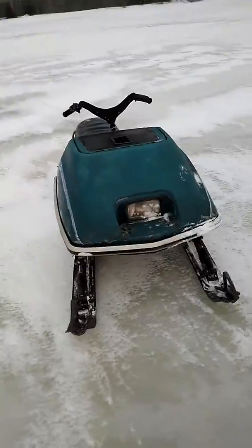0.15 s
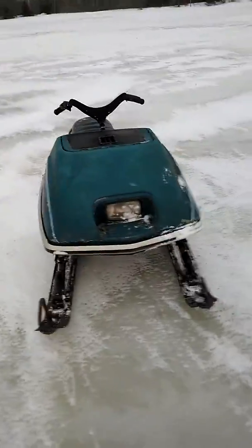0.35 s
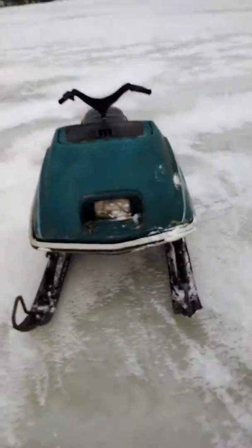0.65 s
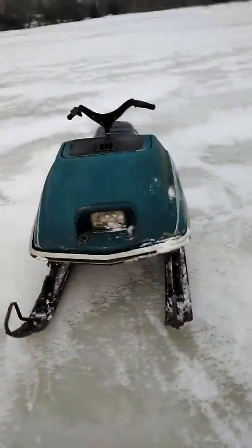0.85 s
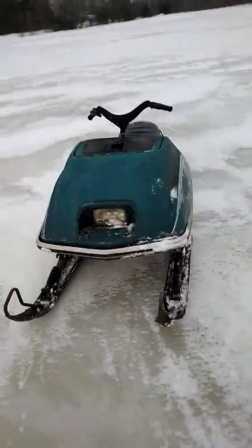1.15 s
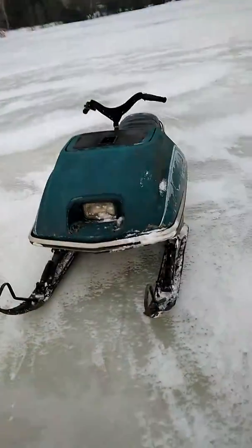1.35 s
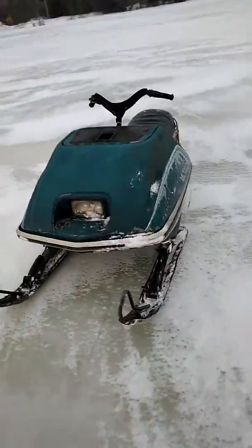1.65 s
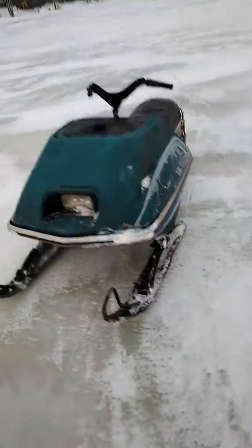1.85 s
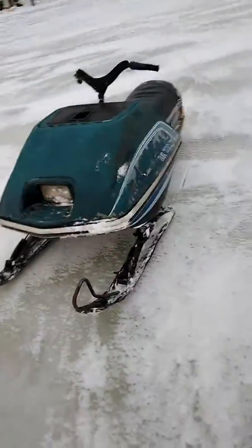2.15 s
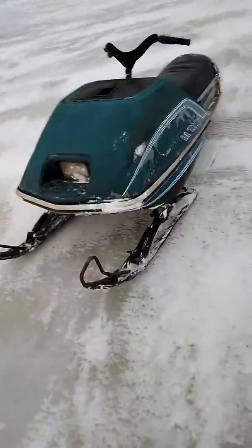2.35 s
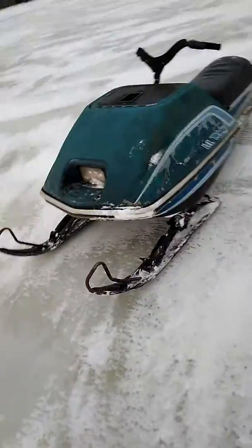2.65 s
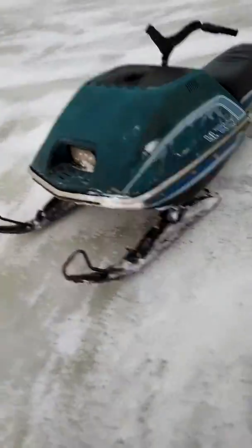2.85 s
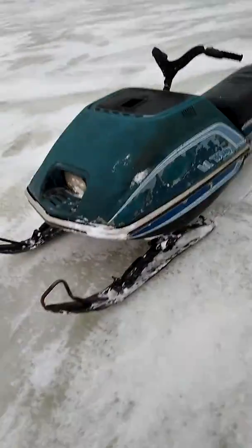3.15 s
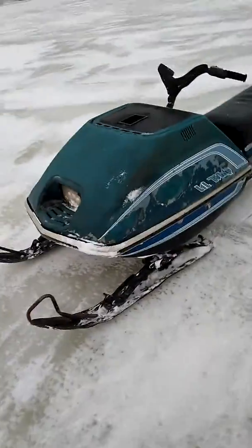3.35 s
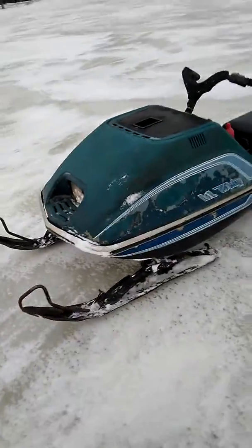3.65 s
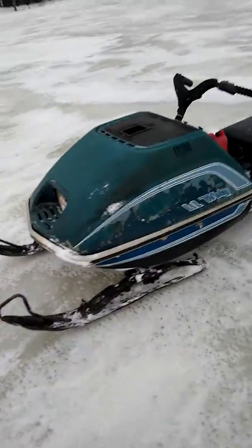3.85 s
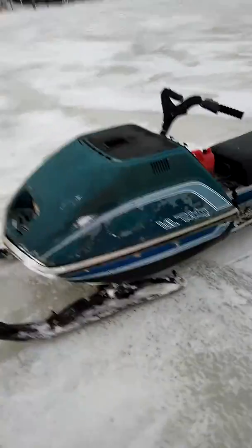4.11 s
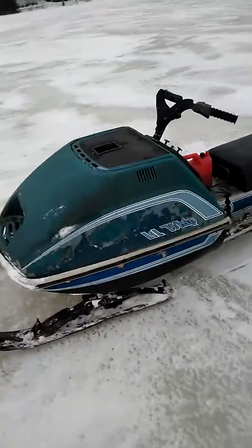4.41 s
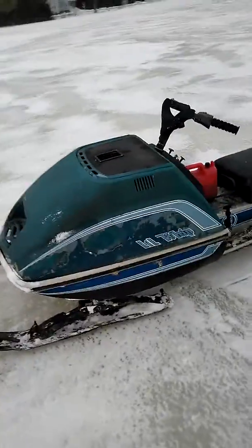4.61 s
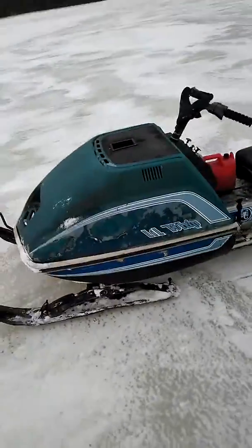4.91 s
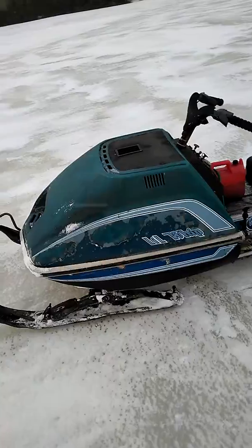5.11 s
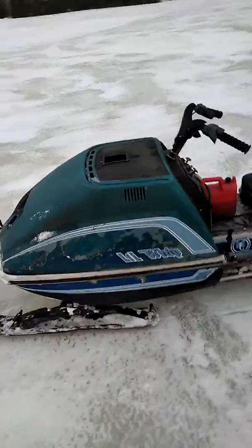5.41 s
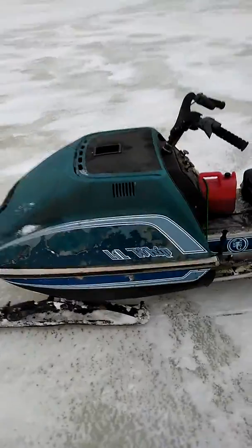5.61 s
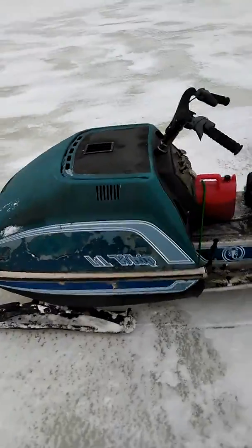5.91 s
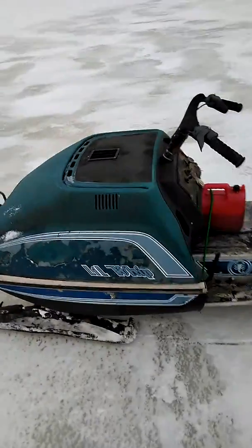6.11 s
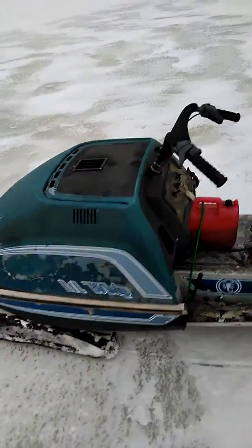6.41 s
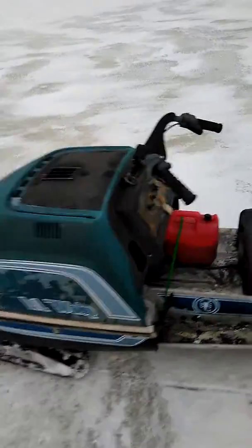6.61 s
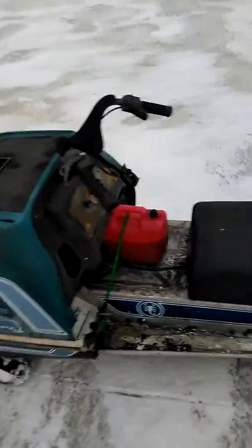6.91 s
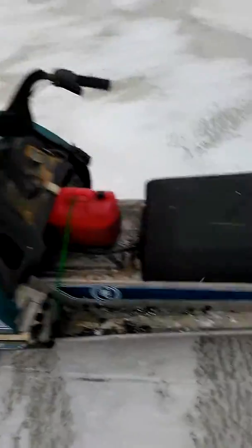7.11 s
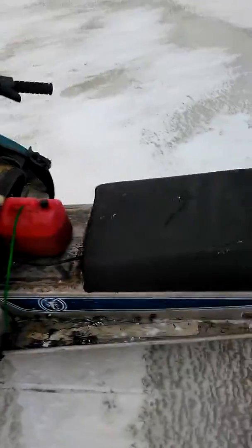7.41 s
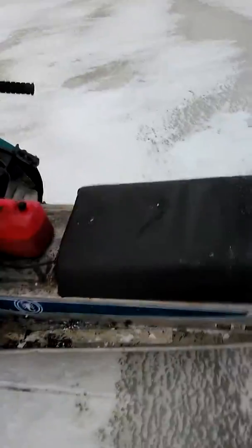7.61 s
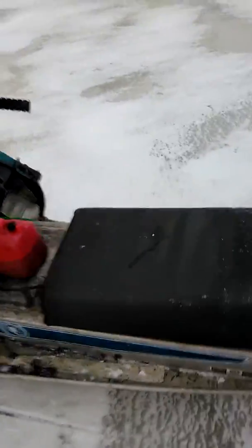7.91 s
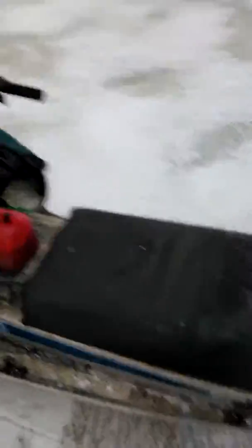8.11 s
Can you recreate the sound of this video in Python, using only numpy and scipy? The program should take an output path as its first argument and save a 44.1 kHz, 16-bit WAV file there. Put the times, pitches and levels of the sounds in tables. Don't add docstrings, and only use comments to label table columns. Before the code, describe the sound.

Steady but lumpy two-stroke idling, already running at the start and still running at the end. Uneven firings nudge the low drone about forty turns a second; raspy puffs of hiss and rattle pulse with the crank, briefly faltering. The exhaust hum grows fuller past the middle, then recedes as mechanical clatter comes nearer. Close handheld stereo phone, dry open air, compressed bass and thin, brittle highs.

```python
import sys
import numpy as np
from scipy import signal
from scipy.fft import rfft, irfft, next_fast_len
from scipy.io import wavfile
from scipy.ndimage import uniform_filter1d

SR = 44100
rng = np.random.default_rng(int(sys.argv[2]) if len(sys.argv) > 2 else 0)


def inscribe(sig):
    pcm = np.round(np.clip(np.atleast_2d(sig).T, -1, 1) * 32767)
    wavfile.write(sys.argv[1], SR, pcm.astype(np.int16))


def boost(x):
    u = np.asarray(x, float) / 20
    return 10 ** u


N = 364266

# (time [s], speed [turns/s])
SPEED = [(0.0, 37.902), (0.5, 38.797), (1.0, 38.575), (1.25, 38.992), (1.75, 38.613), (2.25, 37.467),
         (2.5, 38.36), (3.0, 38.116), (3.5, 38.779), (3.75, 38.959), (4.0, 39.456), (4.51, 39.795),
         (5.01, 39.079), (5.51, 39.454), (7.01, 38.454), (7.51, 38.65), (8.01, 39.239), (8.26, 39.949)]
# (time [s], exhaust side in view [dB], nearness to engine [dB], nearness to vents [dB])
WALK = [(0.0, -3.5, 0.5, 0.5), (0.5, -0.5, 1, 0), (1.0, 1.5, 0.5, 1.5), (1.5, 0.5, 1.5, 0),
        (2.0, -1.5, -0.5, 1), (2.5, -0.5, -0.5, -1.5), (3.0, -1.5, 0, -1.5), (3.5, -1.5, -1, -2),
        (4.0, 3, -1, -1.5), (4.5, 2, 1, 0.5), (5.0, 4, 0.5, -1.5), (5.5, 5, 2, 0), (6.0, 4, 1.5, -1),
        (6.5, 2.5, 2, 0.5), (7.0, -2.5, 2.5, 0.5), (7.5, -4.5, 3, 2.5), (8.0, -6, 4, 0.5),
        (8.26, -4, 4, 2.5)]
# (first firing [s], firings [count], gap [s], thump level [dB])
FIRING_RUNS = [(0.4, 3, 0.206, -17.5), (0.686, 2, 0.23, -18.0), (1.123, 4, 0.103, -23.0),
               (1.563, 1, 0.0, -17.0), (1.764, 3, 0.107, -23.0), (2.024, 1, 0.0, -18.0),
               (2.136, 2, 0.13, -22.0), (2.43, 4, 0.155, -23.0), (2.478, 1, 0.0, -21.5),
               (2.789, 1, 0.0, -19.0), (3.235, 2, 0.086, -19.0), (3.367, 2, 0.105, -22.0),
               (3.597, 3, 0.079, -25.0), (3.853, 2, 0.08, -25.0), (4.235, 3, 0.075, -23.0),
               (4.586, 3, 0.151, -24.5), (4.84, 1, 0.0, -16.5), (5.018, 3, 0.077, -23.5),
               (5.275, 4, 0.076, -23.5), (5.459, 1, 0.0, -20.5), (5.554, 5, 0.102, -23.5),
               (6.116, 2, 0.048, -23.5), (6.269, 3, 0.129, -24.5), (6.606, 3, 0.18, -23.0),
               (7.017, 3, 0.105, -19.5), (7.304, 1, 0.0, -17.5), (7.385, 3, 0.233, -22.0),
               (7.717, 2, 0.08, -19.0), (7.925, 1, 0.0, -18.0), (8.026, 3, 0.078, -21.5),
               (0.108, 1, 0, -28), (0.27, 1, 0, -21), (0.758, 1, 0, -28), (1.703, 1, 0, -21),
                (4.44, 2, 0.125, -31), (4.133, 1, 0, -20), (5.058, 1, 0, -23), (5.696, 1, 0, -22),
                (7.075, 2, 0.098, -26), (7.538, 1, 0, -20), (0.027, 1, 0.0, -22.0),
                (0.159, 2, 0.046, -21.0), (0.357, 2, 0.162, -22.0), (0.872, 1, 0.0, -32.0),
                (1.035, 2, 0.153, -19.0), (1.657, 1, 0.0, -26.0), (1.942, 1, 0.0, -26.0),
                (2.207, 2, 0.159, -23.0), (2.68, 1, 0.0, -24.0), (3.017, 1, 0.0, -20.5),
                (3.126, 2, 0.048, -19.5), (3.541, 1, 0.0, -24.0), (3.894, 3, 0.151, -21.0),
                (4.525, 2, 0.15, -19.0), (4.956, 1, 0.0, -23.0), (5.236, 2, 0.156, -21.0),
                (5.719, 1, 0.0, -26.0), (5.924, 2, 0.129, -21.0), (6.207, 1, 0.0, -19.5),
                (6.461, 1, 0.0, -29.0), (6.701, 2, 0.041, -20.0), (6.904, 1, 0.0, -22.0),
                (7.341, 2, 0.135, -18.0), (7.759, 1, 0.0, -20.0), (8.066, 2, 0.179, -22.5)]
# (crank order, level [dB], lag [cycles])
LOW_ORDERS = [(2, -15.5, 0.079), (3, -23, 0.71), (4, 0, 0.44), (5, -31, 0.86)]
UPPER_ORDERS = [(6, 5, 0.39), (7, -50, 0.78), (8, -3, 0.54)]
# (crank order, level [dB], lag [cycles])
THUMP_ORDERS = [(2, -33, 0.036), (2.5, -22, 0.23), (3, 6.5, 0.5), (3.5, -15, 0.5)]
CRACK_ORDERS = [(6, 8, 0.69), (7, 5, 0.92), (8, -26, 0.25), (9, -2.5, 0.5)]
# (centre [Hz], width [Hz], level [dB])
PANELS = [(738, 50, 0), (964, 42, 4), (1189, 20, -3)]
PANEL_PER_VIEW = [1.1, 0., 0.]
PANEL_PER_NEAR = [0., 1.8, 0.]
# (time [s], depth [dB], length [s])
LULLS = [(0.175, -13, 0.064), (0.481, -6, 0.022), (0.674, -8, 0.041), (0.86, -10, 0.17), (1.44, -9, 0.019),
         (1.857, -18, 0.014), (1.987, -10.5, 0.12), (2.23, -22, 0.014), (2.278, -39, 0.008),
         (2.425, -21, 0.012), (2.872, -10, 0.065), (3.135, -14, 0.022), (3.31, -11, 0.054),
         (3.71, -11, 0.011), (4.158, -2, 0.047), (4.357, -13, 0.046), (4.44, -18, 0.015), (4.676, -7, 0.06),
         (4.814, -8, 0.016), (4.968, -35, 0.015), (5.212, -14, 0.027), (5.535, -11, 0.093),
         (5.712, -10, 0.091), (5.93, -5, 0.1), (6.16, -4, 0.013), (6.392, -9, 0.067), (6.566, -5, 0.022),
         (6.756, -4, 0.049), (7.354, -8, 0.029), (8.225, -12, 0.014)]
# (first turn [s], last turn [s], level [dB])
BURSTS = [(.07, .13, 6.5), (.2, .29, 7.5), (.35, .36, 7), (.39, .445, 9), (.51, .575, 6), (.69, .75, 8.5),
          (.9, .985, 1), (1.07, 1.14, 6), (1.19, 1.24, 6), (1.34, 1.395, 2.5), (1.47, 1.53, 2.5),
          (1.73, 1.76, 5), (1.86, 1.91, 6), (2.04, 2.07, -2), (2.3, 2.355, 8), (2.465, 2.495, 7),
          (2.78, 2.81, 9.5), (2.91, 2.94, 7.5), (3.165, 3.26, 7.5), (3.51, 3.535, 5.5), (3.61, 3.69, 8.5),
          (3.73, 3.85, 9.5), (3.925, 3.97, 7.5), (4.075, 4.125, 6.5), (4.2, 4.28, 8.5), (4.375, 4.405, 9),
          (4.45, 4.48, 1), (4.55, 4.61, 7), (4.7, 4.78, 5.5), (4.855, 4.91, 6.5), (4.98, 4.99, 10.5),
          (5.035, 5.045, 5), (5.11, 5.14, 5.5), (5.235, 5.315, 3), (5.385, 5.47, 5.5), (5.57, 5.62, 8),
          (5.77, 5.8, 7.5), (5.95, 5.98, 10.5), (6.075, 6.135, 10.5), (6.185, 6.28, 9), (6.41, 6.42, 10.5),
          (6.51, 6.52, 7), (6.59, 6.7, 7.5), (6.775, 6.805, 10), (6.895, 6.99, 10.5), (7.05, 7.165, 7),
          (7.285, 7.295, 2), (7.37, 7.53, 5), (7.555, 7.68, 6.5), (7.785, 7.835, 11), (7.885, 7.905, 11),
          (7.96, 7.99, 10), (8.04, 8.115, 8.5), (8.14, 8.195, 5)]
# (time [s], peak [dB])
RAPS = [(0.229, -13), (0.258, -14), (0.387, -10), (0.4125, -4), (0.692, -6), (0.7183, -14), (0.8989, -15),
        (0.9258, 0), (1.2077, -11), (1.3897, -5), (1.5269, -16), (1.857, -11), (1.8807, -13), (2.4663, -6),
        (2.4922, -7), (3.1604, 1), (3.6094, -18), (3.7309, -14), (3.921, -6), (4.0726, -10), (4.0971, -9),
        (4.1225, -22), (4.247, -25), (4.3728, -12), (4.449, -17), (4.549, -16), (4.7534, -16), (4.778, -8),
        (4.9044, -15), (4.9793, -20), (5.44, -23), (5.466, -5), (5.9474, -19), (6.13, -15), (6.2292, -19),
        (6.5127, -22), (6.59, -5), (6.7713, -7), (6.9237, -15), (7.2896, -11), (7.5272, -12), (7.6243, -10),
        (7.786, -19), (7.9024, -15), (8.057, -3), (8.11, -11), (8.188, -16), (8.2357, -14)]
# (time [s], peak [dB], casing knock [dB], lighter snap one turn before [dB])
SNAPS = [(0.4139, -8, -49, -20), (0.7201, -10, -43, -20), (0.9599, -3, -44, -20), (0.9857, -6, -44, -20),
         (1.0933, -9, -45, -20), (1.2081, -9, -37, -20), (1.5284, -7, -42, -20), (1.7346, -10, -45, -20),
         (1.8829, -10, -43, -20), (2.2044, -5, -35, -20), (2.2538, -5, -48, -20), (2.2972, -5, -31, -20),
         (2.3241, -10, -42, -20), (2.4245, -7, -45, -20), (2.4934, -13, -45, -20), (3.6733, -7, -41, -20),
         (4.0985, -8, -36, -20), (4.3781, -8, -42, -20), (4.7805, -2, -28, -12), (4.82, -1, -36, -20),
         (5.4682, -6, -29, -10), (6.1669, -8, -31, -20), (6.5918, -11, -38, -20), (6.9285, -7, -39, -20),
         (7.5294, -12, -34, -20), (7.6259, -15, -33, -20), (7.7876, -14, -30, -20),
         (7.9032, -4.5, -36.5, -20), (8.1135, -11, -30, -20), (8.2372, -10, -33, -20)]
# (frequency [Hz], gain [dB])
LEFT_RESPONSE = [(350, 14), (500, 5.5), (720, 1), (960, 1), (1200, -1), (2000, -5), (2500, -3.5),
                 (3500, -6), (5000, -0.5), (8000, 1.5), (10000, 2), (11000, -3), (13000, -2.5),
                 (15700, -34)]
RIGHT_RESPONSE = [(350, 8.5), (500, 6), (720, 0), (960, -5.5), (1200, 1.9), (2000, -3.5), (2500, -17),
                  (3200, -6.5), (4200, 3), (5500, 7.5), (10300, 7.5), (11000, 4.5), (13000, 11.5),
                  (15700, 2.5)]
# (frequency [Hz], likeness [0..1])
LIKENESS = [(400, 0.91), (1200, 0.93), (2500, 0.086), (4000, 0.87), (6000, 0.016)]
# (frequency [Hz], threshold against usual level [dB])
THINNING = [(700, -25), (1100, -7), (1600, -3), (2200, -8), (2350, 5), (2700, 5), (2870, -7), (3100, -2),
            (3350, -8), (4700, -6), (7000, -8), (9300, -8), (10400, -1), (11200, 2), (12000, -4),
            (13300, -2), (15500, -2)]

T = np.arange(N) / SR
LONG = next_fast_len(N)
TURN_S = 0.0256
EDGE_HZ, EDGE_STEEP = 15900, 200
EVEN_TURNS = np.cumsum(np.interp(T, *np.transpose(SPEED))) / SR


def evened(x):
    return x / np.sqrt(np.mean(x ** 2) + 1e-20)


def read(points, hz):
    f, value = np.transpose(points)
    return np.interp(np.log(hz + 1), np.log(f + 1), value)


def column(rows, index):
    return np.interp(T, [r[0] for r in rows], [r[index] for r in rows])


def clicks(times_s, sizes):
    train = np.zeros(N)
    train[(np.asarray(times_s) * SR).astype(int)] = sizes
    return train


def shaped(x, gain):
    return irfft(rfft(x, LONG) * gain(np.fft.rfftfreq(LONG, 1 / SR)), LONG)[..., :N]


def edge(hz, corner_hz, steep):
    return 1 / np.sqrt(1 + ((hz + 1e-3) / corner_hz) ** (2 * steep))


def peak(hz, centre_hz, width_hz):
    return 1 / np.sqrt(1 + (2 * (hz - centre_hz) / width_hz) ** 2)


def drift(rate_hz):
    return evened(shaped(rng.standard_normal(N), lambda hz: edge(hz, rate_hz, 2.02)))


def air():
    hz = np.fft.rfftfreq(LONG, 1 / SR)
    same = np.clip(read(LIKENESS, hz), 0, 1)
    a, b = rfft(rng.standard_normal((2, N)), LONG)
    late = np.exp(-2j * np.pi * hz * 12 / SR)
    left = late * (same * a + np.sqrt(1 - same ** 2) * b)
    return irfft(np.array([left, a]), LONG)[:, :N]


def grit(per_s, spread_db):
    sizes = boost(spread_db * np.minimum(rng.exponential(1, N), 3.5))
    sizes *= rng.random(N) < per_s / SR
    return signal.oaconvolve(sizes, np.exp(-T[:200] / 0.0044))[:N]


def strokes():
    s, db = np.transpose([(s + k * gap_s, db)
                          for s, count, gap_s, db in FIRING_RUNS
                          for k in range(int(count))])
    turns = np.interp(s, T, EVEN_TURNS)
    angle = np.angle(np.exp(4j * np.pi * turns).sum()) / (4 * np.pi)
    angle += 0.5 * (np.cos(2 * np.pi * (turns - angle)).sum() < 0)
    halves, first = np.unique(np.round(2 * (turns - angle)), return_index=True)
    usual_db, evened_share = -22, 0.5
    return angle, halves / 2, usual_db + evened_share * (db[first] - usual_db)


def firings():
    angle, turns, db = strokes()
    return np.interp(angle + turns, EVEN_TURNS, T), db


def after_firing(shape):
    s, thump_db = firings()
    return signal.oaconvolve(clicks(s, boost(thump_db + 22.5)), shape)[:N]


def swell(width_s, late_s):
    bell = np.exp(-0.5 * ((T[:SR // 10] - 0.05 - late_s) / width_s) ** 2)
    return np.roll(after_firing(bell), -SR // 20)


def crank(kick_turns_per_s=1.9, sag_s=0.07):
    surge = after_firing(kick_turns_per_s * np.exp(-T[:SR // 2] / sag_s))
    surge = np.roll(surge, -500)
    surge -= uniform_filter1d(surge, size=11000)
    return np.cumsum(column(SPEED, 1) + surge) / SR


def since_firing(turns):
    s, fired_turns = firings()[0], strokes()[1]
    return turns - fired_turns[np.searchsorted((s[1:] + s[:-1]) / 2, T)]


def drag(cycles=0.07, build_s=0.012):
    t = T[:SR // 8] - 0.1
    shape = np.exp(np.minimum(t, 0) / build_s) / (1 + np.exp((t - 0.004) / 0.003))
    lag = signal.oaconvolve(clicks(firings()[0], 0.97), shape)[:N]
    return cycles * np.roll(lag, -SR // 10)


def knocks():
    s, knock_db = np.transpose(SNAPS)[[0, 2]]
    hits = clicks(s - 0.0043, boost(1.6 * (knock_db + 38.5)))
    thud = signal.oaconvolve(hits, np.exp(-T[:900] / 0.0032))[:N]
    return shaped(air() * thud, lambda hz: edge(hz, 1900, 6.3))


def snaps():
    s, peak_db, _, before_db = np.transpose(SNAPS)
    right = clicks(s, boost(peak_db)) + clicks(s - TURN_S, boost(peak_db + before_db))
    sides = np.array([boost(4.0) * right, right])
    decay = np.exp(-T[None, :400] / 0.00024)
    rattle = air() * signal.oaconvolve(sides, decay, axes=1)[:, :N]
    return shaped(sides + boost(1.5) * rattle,
                  lambda hz: (edge(hz, 11000, -0.16) + 0.89) * (1 - 0.46 * peak(hz, 8500, 1800)))


def lulls():
    share, sink_share, catch_share, flutter_db = 0.4, 0.6, 0.23, 0.45
    t = T[::64]
    db = 0
    for s, depth_db, length_s in LULLS:
        width_s = length_s * np.where(t < s, sink_share, catch_share)
        db = db + share * depth_db * np.exp(-((t - s) / width_s) ** 2)
    return np.interp(T, t, db) + flutter_db * drift(20)


def opening(turns):
    s = np.transpose(RAPS)[0]
    phase = turns - 0.64
    at = np.interp(s, T, phase)
    return phase + np.interp(T, s, np.round(at) - at)


def bursts(phase):
    s = np.interp(np.arange(400) - 0.85, phase, T)
    puff_db, share, slack_s = -3, 0.65, TURN_S / 2
    runs = sum(db * (s > first - slack_s) * (s < last + slack_s) for first, last, db in BURSTS)
    return puff_db + share * runs


def raps():
    rap_db, rap_s, hush_share, hush_s = 12.5, 0.0042, 0.48, 0.01
    s, peak_db = np.transpose(RAPS)
    burst = signal.oaconvolve(clicks(s, boost(peak_db + rap_db)), np.exp(-T[:1500] / rap_s))[:N]
    hits = clicks(np.r_[s, np.transpose(SNAPS)[0]], 0.96)
    hush = signal.oaconvolve(hits, np.exp(-T[:1500] / hush_s)[::-1])[1500:]
    return burst, 1 - np.clip(hush_share * np.pad(hush, (0, 1)), 0, 0.9)


def hiss(turns):
    phase = opening(turns)
    burst, hush = raps()
    turn_gain = boost(bursts(phase) + 1.2 * rng.standard_normal(400))
    strength = turn_gain[np.clip(phase + 1, 0, 399).astype(int)]
    puff = 1.37 * strength * np.exp(-((phase % 1 - 0.12) / 0.5) ** 2)
    puff = uniform_filter1d(puff, size=70)
    rattle = 0.92 + puff + 0.25 * grit(600, 2.2) * (0.3 + puff)
    body = air() * (hush * rattle + burst)
    body += shaped(air(), lambda hz: 1.34 * edge(hz, 10740, -12.0) + 3.35 * edge(hz, 3900, 2.23))
    return boost(-28.5 + column(WALK, 3) + lulls()) * evened(body)


def clatter(turns):
    view_db, near_db = column(WALK, 1), column(WALK, 2)
    knock = np.exp(-((2 * turns + 0.037) % 1)) * boost(11 * np.tanh(drift(38) / 2))
    crack = after_firing(T[:1500] / 0.0017 * np.exp(1 - T[:1500] / 0.0027))
    body = air() * (1 + 0.5 * knock + 0.69 * crack + 0.44 * grit(200, 1.5))
    rings = 0
    for (f, width_hz, db), per_view, per_near in zip(PANELS, PANEL_PER_VIEW, PANEL_PER_NEAR):
        ring = shaped(body, lambda hz: peak(hz, f, width_hz) ** 2)
        rings = rings + boost(db + per_view * view_db + per_near * near_db) * ring
    body = evened(shaped(body + rings, lambda hz: edge(hz, 3000, 2.62)))
    dull = shaped(body, lambda hz: edge(hz, 880, 1.17))
    body += (boost(-4.5 + 0.087 * view_db) - 1) * dull
    return boost(-44 + near_db) * body / 0.95


def drone(turns, orders, wobble):
    total = 0
    for order, db, lag in orders:
        level = boost(db + 4.7 * wobble * drift(18))
        cycles = order * turns - lag + 0.33 * wobble * drift(23.0)
        total = total + level * np.cos(2 * np.pi * cycles)
    return total


def upper_exhaust(turns):
    view_db = column(WALK, 1)
    ring = evened(shaped(rng.standard_normal((2, N)),
                         lambda hz: peak(hz, 334, 39) + 0.26 * peak(hz, 300, 50)))
    crack = swell(0.0058, -0.00098) * drone(since_firing(turns), CRACK_ORDERS, wobble=0.35)
    turns = T / TURN_S + uniform_filter1d(turns - T / TURN_S, size=500)
    blowdown, blowdown_s = 0.94, 0.06
    fresh = evened(1 + blowdown * after_firing(np.exp(-T[:SR // 4] / blowdown_s)))
    sixth = boost(-0.28 * view_db) * drone(turns, UPPER_ORDERS[:1], wobble=0.09)
    upper = evened(sixth + fresh * drone(turns, UPPER_ORDERS[1:], wobble=0.05))
    upper = upper + boost(-15) * ring + boost(-2 - 0.5 * view_db) * crack
    upper = shaped(upper, lambda hz: 1 + boost(4.5) * peak(hz, 317.9, 34) ** 2)
    upper = np.array([np.roll(upper[0], 7), upper[1]])
    return boost(-35.5 + view_db) * evened(upper)


def low_exhaust(turns):
    view_db = column(WALK, 1)
    rumble = shaped(rng.standard_normal((3, N)),
                    lambda hz: edge(hz, 158, 1.48) * edge(hz, 31, -0.02))
    rumble = evened(rumble[0] + 1.5 * rumble[1:])
    rumble *= boost(-23 + 0.5 * view_db)
    pulse = drone(since_firing(turns), THUMP_ORDERS, wobble=0.2)
    thump = swell(0.0071, 0.0) * pulse * boost(0.15 * view_db)
    dragged = turns - drag()
    under = boost(1.13 * view_db) * drone(dragged, LOW_ORDERS[:2], wobble=0.3)
    low = under + drone(dragged, LOW_ORDERS[2:], wobble=0.18) + boost(-2.0) * thump + rumble
    return np.array([np.roll(low[0], 4) + 0.08 * np.roll(thump, 130), low[1]])


def microphones(hz):
    left = boost(read(LEFT_RESPONSE, hz))
    right = boost(read(RIGHT_RESPONSE, hz)) + boost(28.0) * peak(hz, 8153, 734) ** 1.442
    return np.array([left, right]) * edge(hz, 393, -2.5)


def scene():
    turns = crank()
    steady = boost(-6.5) * shaped(hiss(turns),
                                lambda hz: edge(hz, EDGE_HZ, EDGE_STEEP) * edge(hz, 2640, -1.51))
    top = shaped(steady, lambda hz: edge(hz, 7000, -41.0))
    steady += (boost(-2.5 + 0.057 * column(WALK, 1)) - 1) * top
    ticks = boost(-15) * shaped(snaps(), lambda hz: edge(hz, 2600, -1.9)
                              * (0.05 + edge(hz, EDGE_HZ, EDGE_STEEP)))
    noise = boost(6.5) * clatter(turns) + steady + ticks + boost(-27.5) * knocks()
    upper = upper_exhaust(turns) * boost(np.array([[1.0], [-1.5]]))
    return boost(-21.0) * low_exhaust(turns) + upper + shaped(noise, microphones)


def limit_bass(x):
    bass = shaped(x, lambda hz: edge(hz, 278, 2.06) ** 2)
    envelope = abs(signal.hilbert(bass.mean(0), next_fast_len(N))[:N])
    level = uniform_filter1d(envelope, size=120)
    held = boost(-18.0) * bass / (level + boost(-39.5)) ** 1.095
    return x - bass + shaped(held, lambda hz: edge(hz, 45.0, -1.0) * edge(hz, 330, 0.65))


def thin_out(x):
    hz, _, z = signal.stft(x, SR, nperseg=2048, noverlap=1536)
    paired = hz < 3300
    z[:, paired] = np.array([z[0] + z[1], z[0] - z[1]])[:, paired]
    power = abs(z) ** 2
    usual_db = 10 * np.log10(uniform_filter1d(power.mean(2), size=9, axis=1) + 1e-20)[..., None]
    lately = uniform_filter1d(uniform_filter1d(power, size=9, axis=1), size=70, axis=2)
    usual_db = np.where(hz[:, None] > 2100, 10 * np.log10(lately + 1e-20), usual_db)
    patches = rng.standard_normal((3, 129, z.shape[2])).repeat(8, axis=1)[:, :len(hz)]
    patches = evened(uniform_filter1d(patches[0] + 0.6 * patches[1:], size=5, axis=2))
    over_db = 20 * np.log10(abs(z) + 1e-12) - usual_db
    over_db = over_db - read(THINNING, hz)[:, None] - 6.5 * patches
    over_db[0] -= 4 * ~paired[:, None]
    over_db[1] += 5 * paired[:, None]
    z = z / (1 + boost(-5 * np.clip(over_db, -30, 30)))
    z[:, paired] = np.array([z[0] + z[1], z[0] - z[1]])[:, paired] / 2
    return signal.istft(z, SR, nperseg=2048, noverlap=1536)[1][:, :N]


def round_peaks(x, knee=0.6, room=0.27):
    over = knee + room * np.tanh((abs(x) - knee) / room)
    return np.where(abs(x) > knee, np.sign(x) * over, x)


def band_limit(x):
    return signal.sosfilt(signal.butter(12, 16830, fs=SR, output="sos"), x)


def record(dry):
    out = round_peaks(thin_out(limit_bass(dry)))
    out = shaped(out, lambda hz: edge(hz, EDGE_HZ + 800, EDGE_STEEP))
    return band_limit(out)


dry = scene()
out = record(dry)
inscribe(out)
```